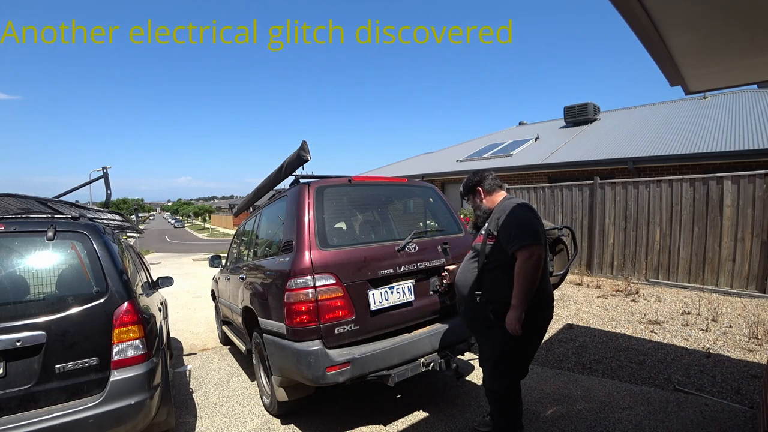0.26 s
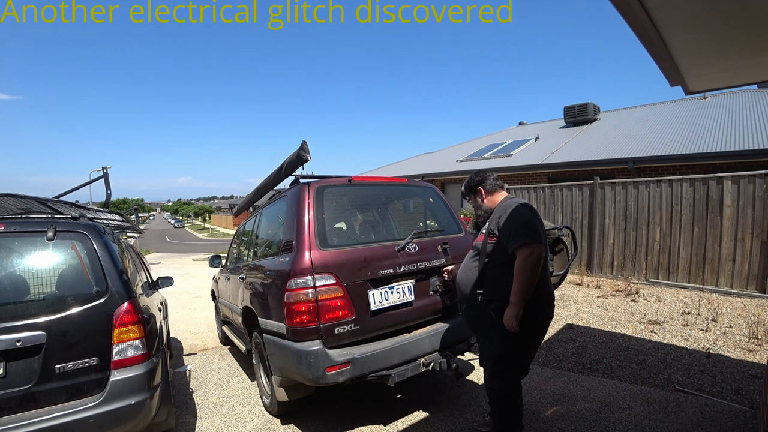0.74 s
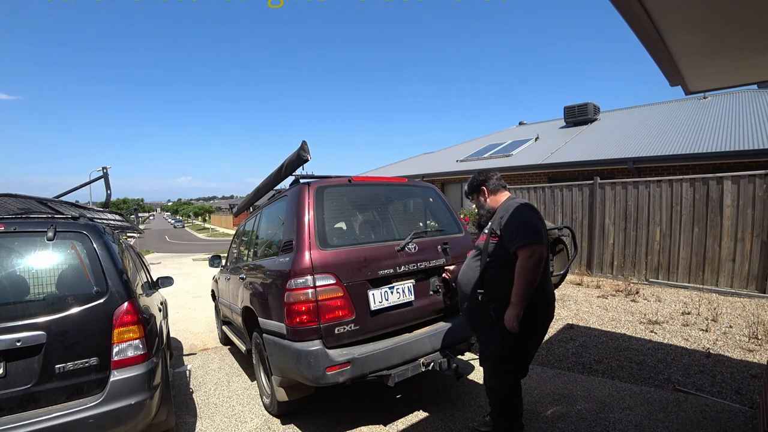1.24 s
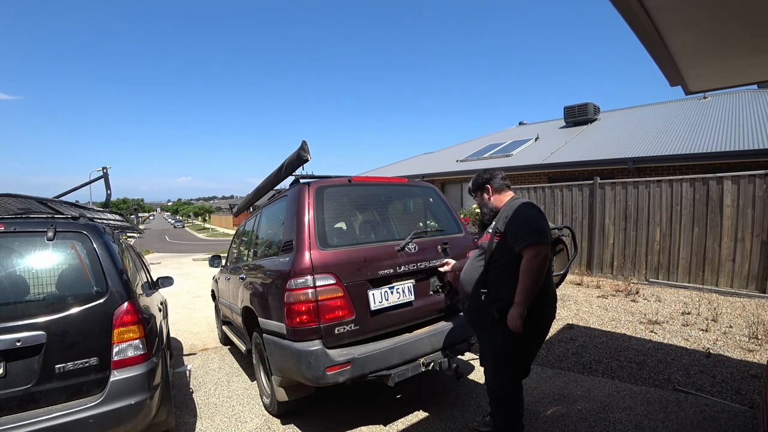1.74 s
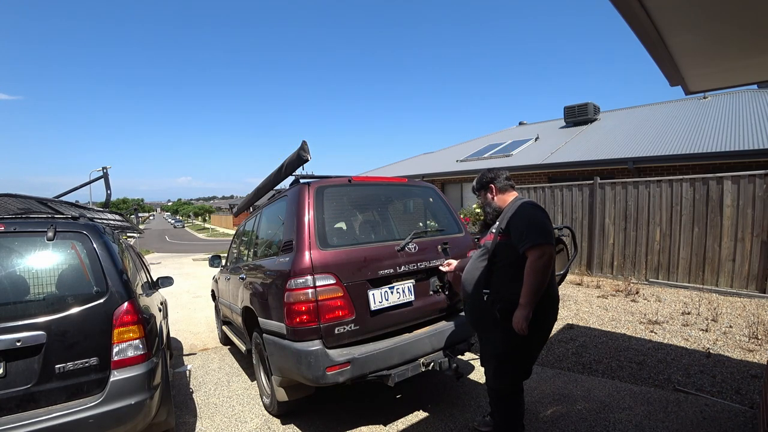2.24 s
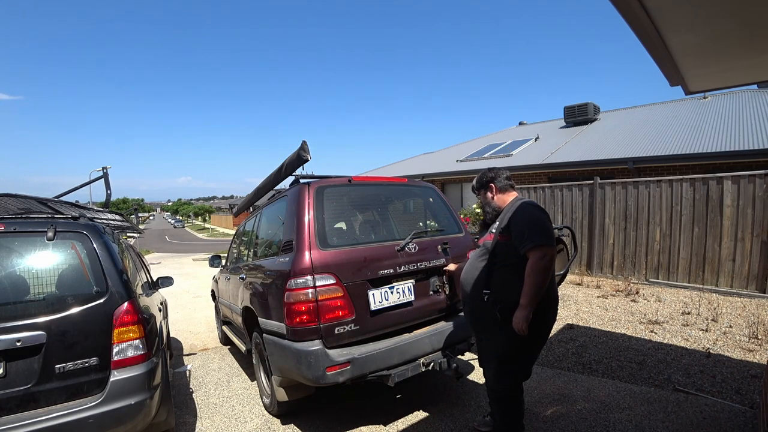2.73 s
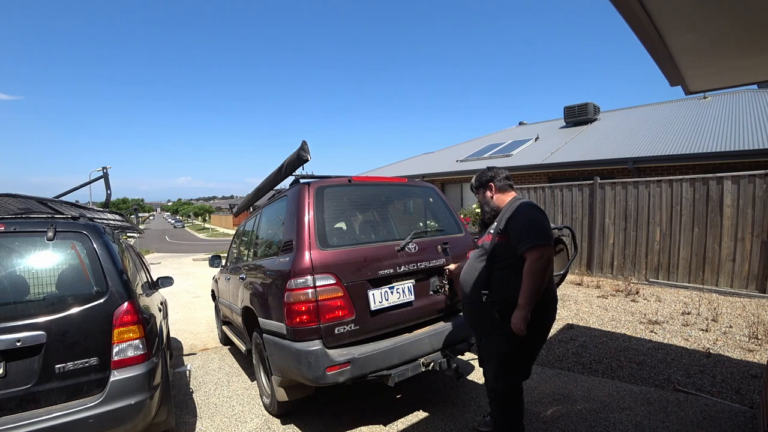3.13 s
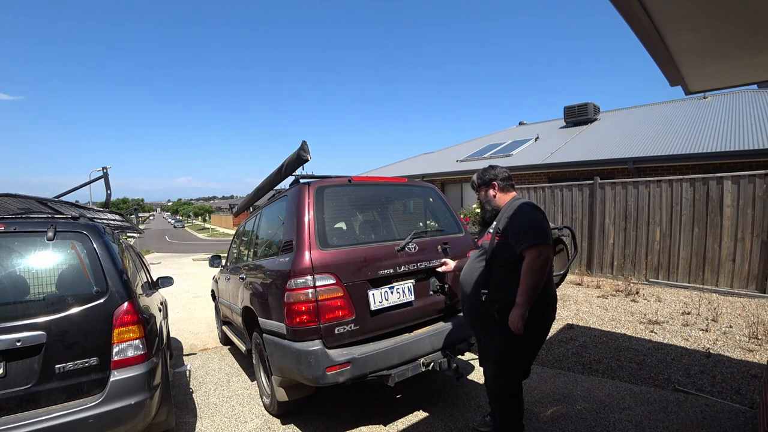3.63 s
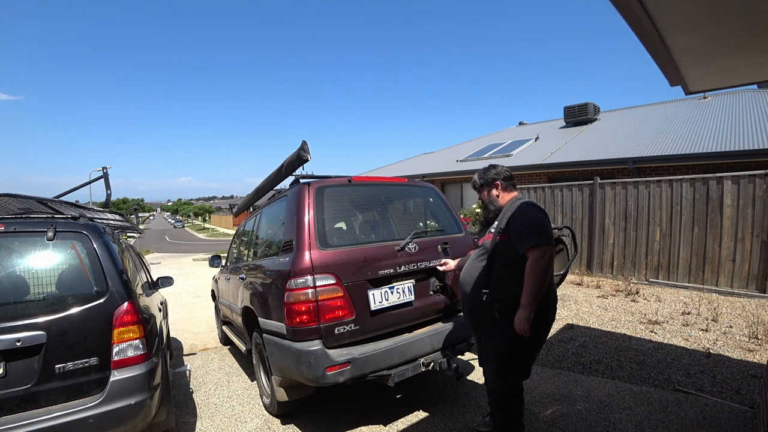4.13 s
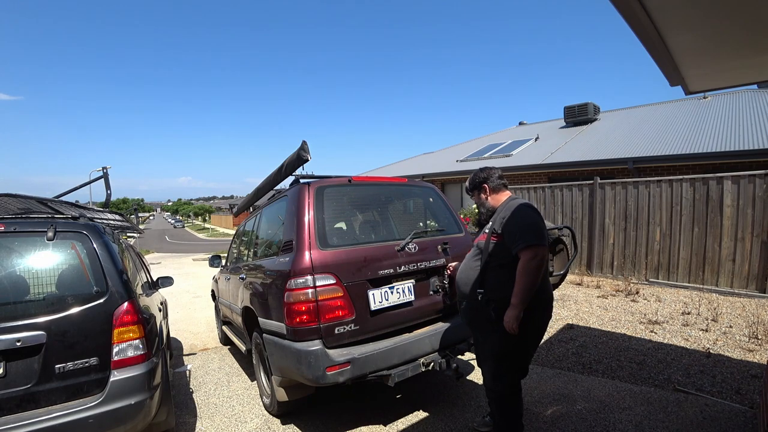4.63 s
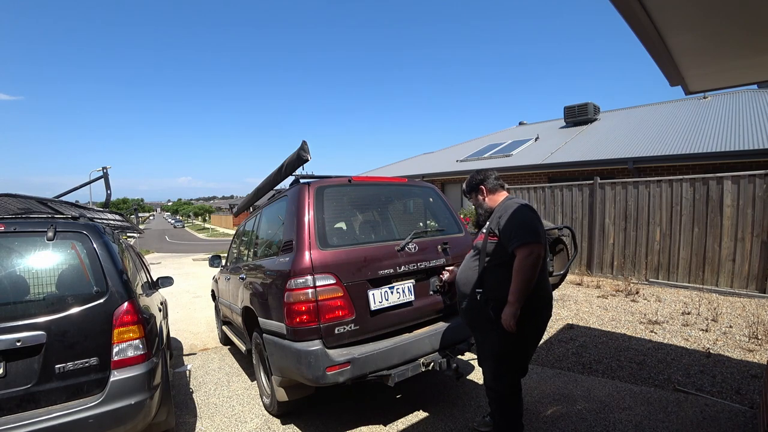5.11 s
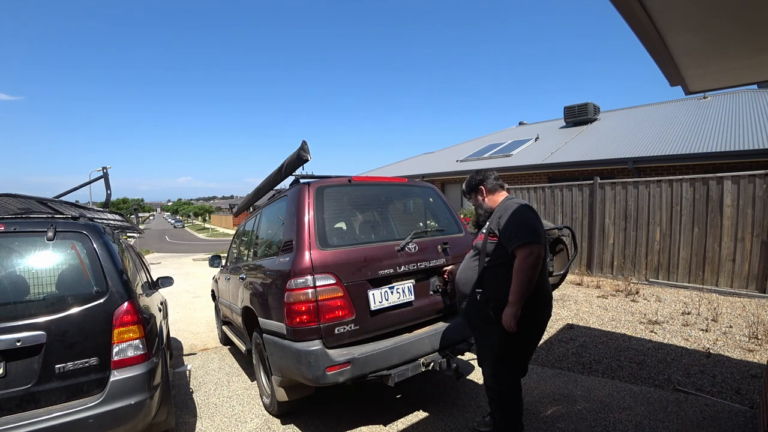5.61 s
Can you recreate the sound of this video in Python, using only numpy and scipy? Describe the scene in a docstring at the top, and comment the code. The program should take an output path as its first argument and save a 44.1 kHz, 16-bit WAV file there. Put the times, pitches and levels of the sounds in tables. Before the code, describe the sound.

On a quiet driveway, someone a few metres away tries a car's rear door. Small clinks of keys and clicks lead to a sharp clunk of the lock. Hollow metal knocks follow as the handle is pulled and released, ending in one strong snap, before more key jingling and light clicking. A small bird chirps softly over a low rumble of breeze and far traffic.

```python
"""A driveway, a few metres from a parked four-wheel drive. Someone tries its rear door.
Brass keys jingle and scrape, the lock clunks over, and the handle is pulled and snaps back,
but the door stays shut. Each knock sets the lock or the door's sheet metal ringing.
A small bird whistles short chirps; light air and distant traffic rumble below."""
import sys
import numpy as np
from scipy import signal
from scipy.fft import rfft, irfft, next_fast_len
from scipy.io import wavfile
from scipy.ndimage import uniform_filter1d

SR = 44100
rng = np.random.default_rng(int(sys.argv[2]) if len(sys.argv) > 2 else 0)


def unload_wav(signal):
    """Save mono or channel-first audio to the path in sys.argv[1] as 16-bit WAV at rate SR, clipped to [-1, 1]."""
    wavfile.write(
        sys.argv[1],
        SR,
        np.round(np.clip(np.atleast_2d(signal).T, -1, 1) * 32767).astype(np.int16),
    )


N = 258602
TIME = np.arange(N) / SR
AGE = TIME[:SR * 3 // 4]   # seconds since one short sound began

# Knocks inside the lock: start_s, clack_db, thud_db, click_db, ring_s, favoured_hz
LOCK_KNOCKS = [(0.001, -29.5, -42, -38.5, 0.54, 2872), (0.173, -24.5, -42.5, -37, 0.4, 1777),
               (0.363, -29.5, -47, -45.5, 0.22, 930), (0.58, -28.5, -44.5, -68, 0.28, 987),
               (0.709, -32, -40, -42, 0.3, 557), (0.988, -52, -46, -68, 0.32, 530),
               (1.114, -33, -45.5, -72, 0.35, 1390), (1.405, -7, -25.5, -27.5, 0.21, 938),
               (1.424, -10.5, -24, -19.5, 0.31, 425), (1.4458, -13.5, -37, -19, 0.3, 2150),
               (1.449, -13, -30, -16, 0.3, 2217), (1.709, -43.5, -60, -48.5, 0.24, 590),
               (1.845, -43, -49.5, -54, 0.2, 933), (3.197, -33.5, -46, -46.5, 0.2, 935),
               (3.374, -35.5, -53.5, -53.5, 0.2, 1380), (5.081, -28, -46, -36.5, 0.22, 1040),
               (5.169, -24, -41.5, -44.5, 0.4, 1730), (5.19, -17.5, -39.5, -41, 0.23, 2632),
               (5.334, -28, -44, -42.5, 0.22, 1040), (5.359, -29, -39, -38, 0.24, 474),
               (5.427, -33.5, -45, -45, 0.3, 990), (5.779, -41, -53.5, -46, 0.18, 940)]
# The lock's natural tones, which each knock reshapes: pitch_hz, level_db, ring_s
LOCK_TONES = [(250, -4.5, 0.29), (270, -1.5, 0.21), (419, -5.5, 0.22), (450.6, -4, 0.17), (584, -8, 0.11),
              (780, -11, 0.27), (942, -2.5, 0.14), (1212, 2.5, 0.1), (1439, 0, 0.063), (1700, -10, 0.15),
              (1735, -7.5, 0.1), (1844, -4.5, 0.16), (2050, -16, 0.18), (2100, -16.5, 0.069),
              (2165, -4.5, 0.17), (2470, -16, 0.1), (2683, -23, 0.26), (3010, -16.5, 0.2),
              (2872, -11.5, 0.14), (5050, -43, 0.18), (8600, -21, 0.41)]
def lock():
    """The parts of the lock knock together as the key turns."""
    return knocks(LOCK_KNOCKS, LOCK_TONES, panel_db=-0.5, crack_db=-12.5, crack_s=0.034, favour_db=15.5,
                  swell_s=0.0001, trims_db=(-11.0, -1.5, -3.5), click_stretch=1.47)


# The handle pulled and let go: start_s, clack_db, thud_db, click_db, ring_s, favoured_hz
HANDLE_KNOCKS = [(1.9465, -31.5, -36, -59, 0.34, 810), (2.3355, -17, -20.5, -50, 0.17, 533),
                 (2.957, -19.5, -24.5, -29, 0.28, 580), (3.02, -56, -38, -63, 0.21, 236),
                 (3.662, -36.5, -47.5, -61, 0.46, 595), (3.711, -38.5, -54, -60, 0.19, 826),
                 (3.747, -54, -37.5, -64, 0.14, 692), (3.76, -24, -32.5, -44.5, 0.23, 990),
                 (4.301, -39.5, -45, -53.5, 0.31, 394), (4.5215, -10, -22, -36, 0.16, 800),
                 (4.5245, -10.5, -16.5, -29, 0.17, 510)]
# The door's natural tones, which each knock reshapes: pitch_hz, level_db, ring_s
DOOR_TONES = [(68.5, -12.5, 0.26), (137.8, -13.5, 0.5), (234.2, -7.5, 0.33), (275, -1, 0.13),
              (334.6, -12, 0.2), (374, -19, 0.48), (485, -0.5, 0.16), (513.7, -5.5, 0.21),
              (610.6, -7, 0.17), (809, -6.5, 0.21), (894, 0, 0.17), (976, 8.5, 0.066), (1055, -3.5, 0.19),
              (1175, -8.5, 0.19), (1470, -18, 0.053), (2004, -16, 0.076), (2394, -18, 0.089),
              (2320, -8.5, 0.09), (3140, -23.5, 0.17), (3630, -9, 0.11)]
def handle():
    """The handle is pulled and snaps back, making the door ring."""
    return knocks(HANDLE_KNOCKS, DOOR_TONES, panel_db=-2.0, crack_db=-1.0, crack_s=0.024, favour_db=5.0,
                  swell_s=0.001, trims_db=(-9.5, -4.0, -3.5), click_stretch=2.2)


# The dense ringing of sheet metal: pitch_hz, level_db
PANEL = [(20, -28), (60, 4), (120, -6.5), (180, -13), (250, 1.5), (500, 5), (1000, 4), (2000, -1.5),
         (3000, -10), (4000, -11.5), (7000, -11.5), (9000, -21), (11000, -23)]
def knocks(rows, natural_tones, panel_db, crack_db, crack_s, favour_db, swell_s, trims_db, click_stretch):
    """Each blow cracks, then rings in the metal: a low thud, a middle clack and a high click."""
    out, early = np.zeros((2, N)), SR // 32
    clack_trim, thud_trim, click_trim = trims_db
    for start_s, clack_db, thud_db, click_db, ring_s, favoured_hz in rows:
        shape = fade(ring_s) + from_db(crack_db) * fade(crack_s)
        panel = rms_one(noise(PANEL, len(AGE)) * shape, early)
        struck = favour(natural_tones, favoured_hz, favour_db, width_hz=106)
        tones = ring(struck, stretch=ring_s / 0.2, scatter_db=3.5)
        blow = rms_one(tones, early) + from_db(panel_db) * panel
        swell = 1 - np.exp(-AGE / swell_s)   # the heavy panel takes a moment to move
        treble = cut(blow, 2940, "high", order=4) * fade(ring_s * click_stretch)   # dies first
        thud = from_db(thud_db + thud_trim) * rms_one(cut(blow * swell, 808, "low"), early)
        clack = from_db(clack_db + clack_trim) * rms_one(cut(blow * swell, [700, 3000], "band"), early)
        click = from_db(click_db + click_trim) * rms_one(treble, early)
        add(out, start_s, thud + clack + click)
    return out


def door_boom(start_s, pitch_hz, level_db, ring_s):
    """A tug on the handle rocks the whole door against its seal, in one deep tone."""
    out = np.zeros((2, N))
    add(out, start_s, from_db(level_db) * fade(ring_s) * np.sin(2 * np.pi * pitch_hz * AGE))
    return out


# Keys touching each other and the lock's barrel: start_s, level_db, favoured_hz, clack_db, rattle_db
CLINKS = [(0.1504, -27.5, 7640, -36, 17), (0.2104, -26, 7620, -42, 3), (0.2522, -32, 2500, -35, 14),
          (0.3227, -52, 3530, -41, -2), (0.405, -27.5, 9100, -49, -9), (0.4463, -32.5, 6430, -65, -8),
          (0.522, -33.5, 7000, -44, -14), (0.558, -32.5, 10100, -67, 7), (0.591, -33, 6900, -58, 9),
          (0.7266, -27, 8800, -60, -4), (0.83, -24.5, 9100, -41, -2), (0.85, -23.5, 8800, -41.5, -12),
          (0.8929, -30, 8350, -47, -15), (0.9308, -35, 2130, -43, -16), (0.9991, -30.5, 6960, -57, 6),
          (1.0242, -31.5, 2340, -38, -1), (1.1534, -33, 8900, -61, 1), (1.2625, -26, 8450, -66, -34),
          (1.3807, -17.5, 8360, -39, -11), (1.5936, -31, 2120, -44, -6), (1.712, -36.5, 3050, -45.5, -6),
          (3.0716, -30, 8500, -38.5, -17), (3.2552, -32.5, 2740, -40.5, 25),
          (3.2868, -35, 2490, -44.5, -17), (3.336, -37.5, 8250, -47.5, -3), (4.8434, -25, 3000, -29.5, -2),
          (4.8566, -27.5, 3010, -38, 6), (4.9554, -32, 3020, -36.5, -5), (4.9921, -33.5, 3530, -45, -9),
          (5.3005, -32.5, 6800, -50, 9), (5.4735, -33.5, 3050, -38, 1), (5.4889, -32, 6880, -40, 4),
          (5.5749, -22.5, 6500, -52, 5), (5.642, -32, 8700, -51, 13), (5.684, -28, 6900, -57, 5),
          (5.8203, -29.5, 3540, -30.5, -2)]
# The keys' natural tones: pitch_hz, level_db, ring_s
KEY_TONES = [(2110, -5, .12), (2490, -11, .08), (3000, -8, .06), (3530, -10, .07), (6560, -9, .06),
             (6930, -5, .08), (7630, -9, .07), (8190, -7, .08), (8600, -3, .09), (8690, -4, .09),
             (10100, -9, .06), (10450, -9, .05)]
# The tick of brass on brass: pitch_hz, level_db
KEY_TICK = [(1000, -5.5), (2100, 1.5), (3200, 0.5), (4800, -2), (6800, 2.5), (8600, 1), (9500, -1.5),
            (11000, -5)]
def key_clinks(bright_db, barrel_db, tones_db, tick_s, rattle_s):
    """A hard tick with a rattle behind it; held in the hand, the keys ring only briefly."""
    out, early = np.zeros((2, N)), SR // 200
    for start_s, level_db, favoured_hz, clack_db, rattle_db in CLINKS:
        struck = favour(KEY_TONES, favoured_hz, gain_db=8, width_hz=200)
        detuned = [(hz * rng.normal(1, .012), db, ring_s) for hz, db, ring_s in struck]
        tick = noise(KEY_TICK, len(AGE)) * (fade(tick_s) + from_db(rattle_db) * fade(rattle_s))
        tones = ring(detuned, stretch=.5, scatter_db=2.5)
        touch = rms_one(tick, early) + from_db(tones_db) * rms_one(tones, early)
        touch *= 1 - np.exp(-AGE / 0.00098)   # the keys slide into contact
        bright = from_db(level_db + bright_db) * rms_one(cut(touch, 5300, "high"), early)
        barrel = from_db(clack_db + barrel_db) * rms_one(cut(touch, [2300, 4300], "band"), early)
        add(out, start_s, bright + barrel)
    return out


# Spells of working the key: start_s, end_s, keys_db, door_db
KEY_SPELLS = [(0.0, 0.35, -53, -50), (0.347, 1.053, -53.5, -59), (1.06, 1.161, -49.5, -45.5),
              (1.165, 1.397, -56.5, -75), (1.577, 1.855, -55.5, -55.5), (2.896, 3.12, -52, -68),
              (3.12, 3.405, -55.5, -49.5), (4.83, 5.43, -59.5, -56), (5.466, 5.728, -51, -66),
              (5.735, 5.853, -55, -52)]
def fumbling(jingle_db, rub_db, scrape_db):
    """The keys shiver and scrape, most after a clink; the hand rubs the door, most around a knock."""
    stirs = [(s, db - 35.5) for s, db, *_ in CLINKS]
    presses = [(s, min(thud_db - 6, -42)) for s, _, thud_db, *_ in LOCK_KNOCKS]
    jingle_gain = swells(stirs, rise_s=0.0064, settle_s=0.047)
    rub_gain = swells(presses, rise_s=0.0076, settle_s=0.03)
    for start_s, end_s, keys_db, door_db in KEY_SPELLS:
        on = (TIME >= start_s) & (TIME < end_s)
        active = uniform_filter1d(on * 1., int(0.079 * SR))   # fade in and out
        jingle_gain += active * from_db(keys_db)
        rub_gain += active * from_db(door_db)
    scratches = grains(per_s=1300, spread_db=15.5)
    scrape = rms_one(convolve(scratches, noise(KEY_TICK, len(AGE)) * fade(0.0079)))
    bunch = jingle(per_s=48, ping_s=0.019, tones_db=-7.5, pitch_count=20)
    jingling = rms_one(bunch + from_db(scrape_db) * scrape)
    door = noise(PANEL, len(AGE)) * fade(0.077)
    door += from_db(-10.5) * ring(LOCK_TONES, stretch=0.71, scatter_db=1.5)
    rubbing = rms_one(cut(convolve(grains(per_s=170, spread_db=4.0), door), 2350, "low"))
    return from_db(jingle_db) * jingle_gain * jingling + from_db(rub_db) * rub_gain * rubbing


def jingle(per_s, ping_s, tones_db, pitch_count):
    """Tiny touches in the bunch: each makes a short ping or rings one of the keys' tones."""
    pitches = np.geomspace(2000, 11000, pitch_count) * rng.normal(1, .01, pitch_count)
    pings = [(hz, at_hz(KEY_TICK, hz) + 10 * np.log10(hz / 7000), ping_s) for hz in pitches]
    rings = [(hz, db + tones_db, ring_s) for hz, db, ring_s in KEY_TONES]
    out = np.zeros((2, N))
    for tone in pings + rings:
        touches = grains(per_s, spread_db=4.5)
        note = ring([tone], stretch=1, scatter_db=0)[:, :SR // 8]
        out += signal.oaconvolve(touches, note, axes=-1)[:, :N]
    return rms_one(out)


def driveway(x, tail_db, ring_s, delay_s, bounce_s, bounce_db):
    """The concrete returns a quick bounce; fence, eaves and the next car add a thin, late tail."""
    tail = noise([(100, 12.0), (500, -8), (3000, -1.5), (10000, -4.5)], len(AGE), focus=0.33)
    build_up = 1 - np.exp(-(AGE / delay_s) ** 4)
    out = x + from_db(tail_db) * convolve(x.mean(axis=0, keepdims=True), tail * fade(ring_s) * build_up)
    add(out, bounce_s, from_db(bounce_db) * x)
    return out


# Bird calls: top_s, top_hz, base_hz, rise_s, fall_s, level_db, hoarse_share (of the pitch), octave_db
CHIRPS = [(.365, 6300, 4300, 0.046, 0.071, -49, 0.032, -30),
          (2.072, 3565, 2100, 0.023, 0.018, -52.5, 0.019, -8),
          (2.11, 3600, 2590, .02, 0.052, -60, 0.034, -13),
          (2.293, 3600, 2290, .03, 0.063, -56.5, 0.022, -4.5),
          (2.503, 5310, 2524, .007, 0.04, -49, 0.056, -33),
          (2.726, 5320, 2540, .015, 0.035, -43.5, 0.043, -29),
          (3.62, 3090, 2925, 0.24, 0.12, -56, 0.13, -4), (3.839, 2624, 1790, .04, 0.058, -48, 0.079, -21),
          (4.068, 3520, 2780, 0.081, 0.026, -62.5, 0.0079, -44),
          (4.36, 3680, 3480, .04, 0.06, -54, 0.12, -8), (4.635, 3785, 3740, .04, 0.025, -52.5, 0.013, -11),
          (4.69, 4160, 3690, 0.047, 0.057, -59, 0.087, -5)]
def bird(trim_db, echo_db, echo_s):
    """Whistles arch up and slide down, loudest at the top, smeared by fence and roofs."""
    lead, trail = 2.6, 3.5   # a call spans this many rise times before its top, and fall times after
    song = np.zeros((1, N))
    wobble = rms_one(cut(rng.standard_normal(N), 249, "low"))
    for top_s, top_hz, base_hz, rise_s, fall_s, level_db, hoarse_share, octave_db in CHIRPS:
        on = (TIME > top_s - lead * rise_s) & (TIME < top_s + trail * fall_s)
        t = TIME[on] - top_s
        away = t / np.where(t < 0, rise_s, fall_s)
        arch = 1 / (1 + away ** 2)
        taper = np.cos(np.pi / 2 * away / np.where(t < 0, lead, trail))
        pitch_hz = (base_hz + (top_hz - base_hz) * arch) * (1 + hoarse_share * wobble[on])
        phase = 2 * np.pi * np.cumsum(pitch_hz) / SR
        whistle = np.sin(phase) + from_db(octave_db) * np.sin(2 * phase)
        song[0, on] += from_db(level_db + trim_db) * arch ** 0.61 * taper * whistle
    out = song + convolve(song, noise([(2000, 0), (9000, 0)], len(AGE)) * fade(0.43))
    add(out, echo_s, from_db(echo_db) * song)
    return out


# Puffs of air: peak_s, level_db
GUSTS = [(0.18, -63), (1.65, -55.5), (2.25, -47), (2.84, -46), (3.9, -51)]
# Their low rumble: pitch_hz, level_db
RUMBLE = [(15, -5.5), (28, 16.5), (45, 3), (85, 7.5), (120, 5), (200, -17), (500, -38)]
def breeze(steady_db, trim_db):
    """Light air rumbles and swells with each puff."""
    strength = from_db(steady_db) + swells(GUSTS, rise_s=0.11, settle_s=0.054)
    return from_db(trim_db) * strength * noise(RUMBLE, N)


# The wash of air and distant traffic: pitch_hz, level_db
TRAFFIC = [(12, -12), (20, -15.5), (123, -4), (208, -16.5), (510, -19), (718, -22.5), (797, -23.5),
           (1040, -22.5), (2110, -26.5), (3130, -32), (3570, -29.5), (3870, -34), (10800, -39),
           (14000, -80), (22000, -120)]
def background(traffic_db, whine_db, whine_hz):
    """Distant traffic comes from all round, with a faint, flickering high whine."""
    flicker = rms_one(cut(rng.standard_normal((2, N)), 50, "low", order=2))
    whine = flicker * np.sin(2 * np.pi * whine_hz * TIME)
    return from_db(traffic_db) * noise(TRAFFIC, N, focus=0.068) + from_db(whine_db) * whine


# How alike the two ears hear scattered sound: pitch_hz, likeness (1 = the same)
LIKENESS = [(60, .97), (300, .97), (700, .95), (1400, .82), (3000, .72), (9000, .72)]
def noise(spectrum, size, focus=1):
    """Shaped stereo noise; the ears differ more in the treble, and when focus is under 1."""
    length = next_fast_len(size)
    hz = np.arange(length // 2 + 1) * SR / length
    mid, side = rfft(rng.standard_normal((2, length))) * from_db(at_hz(spectrum, hz))
    alike = np.clip(at_hz(LIKENESS, hz), 0, 1) ** (1 / focus)
    ears = np.sqrt(1 + alike) * mid + np.sqrt(1 - alike) * side * [[1], [-1]]
    return rms_one(irfft(ears, length)[:, :size])


def ring(tones, stretch, scatter_db):
    """Struck tones fade, their ring times scaled by stretch; high ones reach the ears out of step."""
    out = np.zeros((2, len(AGE)))
    for hz, db, ring_s in tones:
        skew = np.arccos(np.clip(at_hz(LIKENESS, hz), 0, 1)) / 2 * rng.choice([-1, 1])
        phase = rng.uniform(0, 2 * np.pi) + np.array([[skew], [-skew]])
        strength = from_db(db + scatter_db * rng.normal())
        out += strength * fade(ring_s * stretch) * np.sin(2 * np.pi * hz * AGE + phase)
    return out


def favour(tones, near_hz, gain_db, width_hz):
    """The spot that is hit makes the tones near one pitch louder."""
    return [(hz, db + gain_db * np.exp(-((hz - near_hz) / width_hz) ** 2), s) for hz, db, s in tones]


def grains(per_s, spread_db):
    """Random tiny contacts of uneven size."""
    sizes = from_db(spread_db * np.minimum(rng.exponential(1, N), 3)) * rng.choice([-1, 1], N)
    return (sizes * (rng.random(N) < per_s / SR))[None]


def swells(events, rise_s, settle_s):
    """Loudness that grows towards each event and settles after it."""
    power = np.zeros(N)
    for peak_s, level_db in events:
        away = np.maximum((peak_s - TIME) / rise_s, (TIME - peak_s) / settle_s)
        power += (from_db(level_db) * np.exp(-np.minimum(away, 20))) ** 2
    return np.sqrt(power)


def from_db(db):
    """Turn decibels into a multiplier."""
    return 10 ** (np.asarray(db) / 20)


def rms_one(x, size=None):
    """Scale so the average strength (rms) is 1, judged on the first size samples."""
    return x / np.sqrt(np.mean(x[..., :size] ** 2) + 1e-20)


def at_hz(points, hz):
    """Read between a table's rows, with octaves evenly spaced."""
    known_hz, values = np.transpose(points)
    return np.interp(np.log(np.maximum(hz, 1)), np.log(known_hz), values)


def fade(ring_s):
    """Die away by 60 dB in ring_s seconds."""
    return np.exp(-np.log(1000) * AGE / max(ring_s, 1e-3))


def cut(x, hz, kind, order=3):
    """Keep only the lows, the highs or a band between."""
    return signal.sosfilt(signal.butter(order, hz, kind, fs=SR, output="sos"), x)


def add(out, start_s, sound):
    """Mix a sound in at start_s."""
    start = max(round(start_s * SR), 0)
    out[:, start:start + sound.shape[-1]] += sound[..., :N - start]


def convolve(x, response):
    """Let every sample of x set off the response, scaled to an energy of 1 per ear."""
    return signal.fftconvolve(x, response / np.sqrt(np.sum(response ** 2) / 2), axes=-1)[:, :N]


def scene():
    """The door stands slightly to the right, with bird, breeze and traffic around it."""
    door = lock() + handle()
    door += key_clinks(bright_db=-10.0, barrel_db=-1.5, tones_db=-1.5, tick_s=0.012, rattle_s=0.14)
    door += fumbling(jingle_db=-0.5, rub_db=0.5, scrape_db=-5.5)
    door += door_boom(start_s=2.217, pitch_hz=56, level_db=-32, ring_s=.24)
    near = driveway(door, tail_db=-18.5, ring_s=0.44, delay_s=0.017, bounce_s=.0035, bounce_db=-18)
    near *= from_db([[-.6], [.5]])   # left, right
    chirps = bird(trim_db=-1.5, echo_db=-25.0, echo_s=0.049)
    wind = breeze(steady_db=-56, trim_db=0.5)
    return near + chirps + wind + background(traffic_db=-51.0, whine_db=-74.0, whine_hz=9980)


def record(dry):
    """The hardest peaks are rounded and the highest treble is cut steeply."""
    peak_limit, cutoff_hz = 0.66, 11100
    rounded = peak_limit * np.tanh(dry / peak_limit)
    return signal.sosfilt(signal.ellip(12, .1, 80, cutoff_hz, fs=SR, output="sos"), rounded)


dry = scene()
out = record(dry)
unload_wav(out)
```